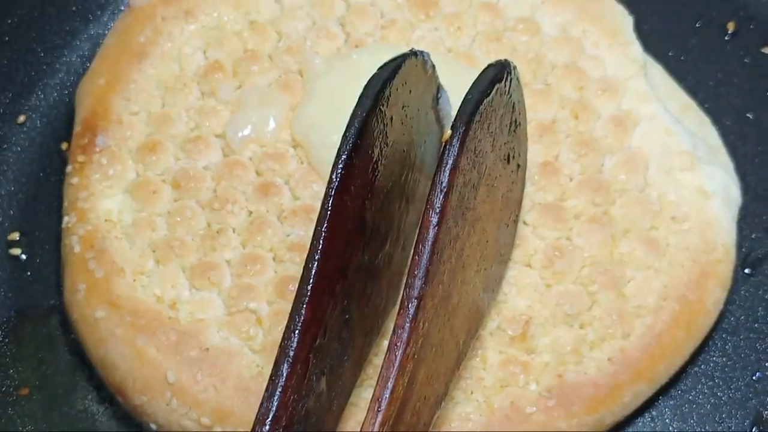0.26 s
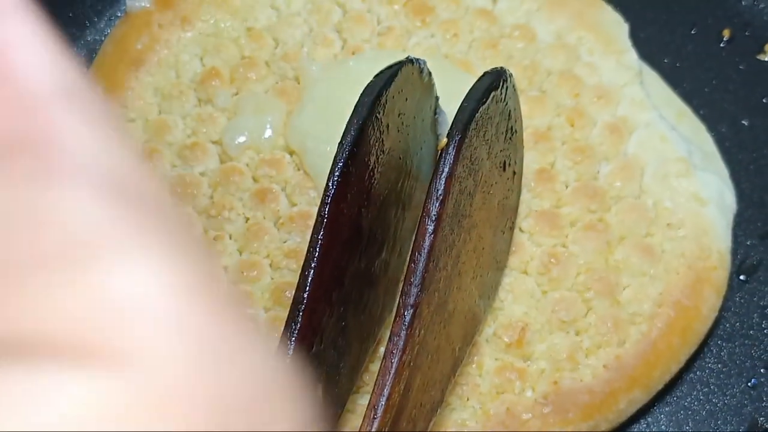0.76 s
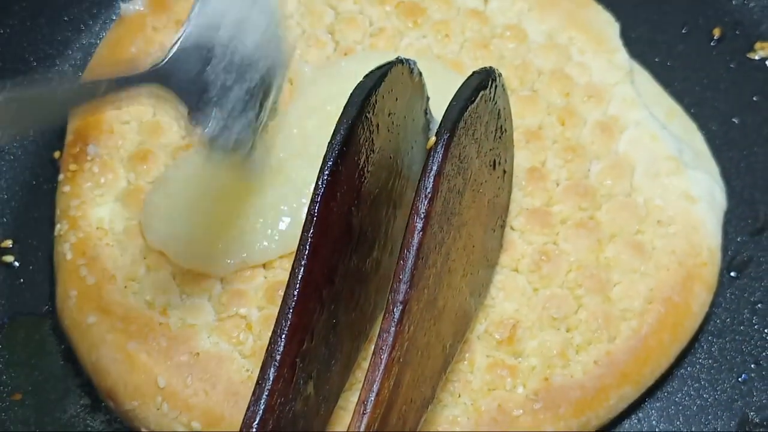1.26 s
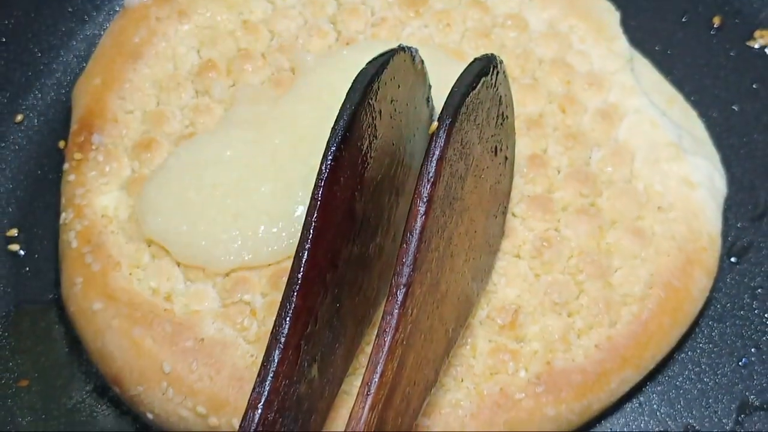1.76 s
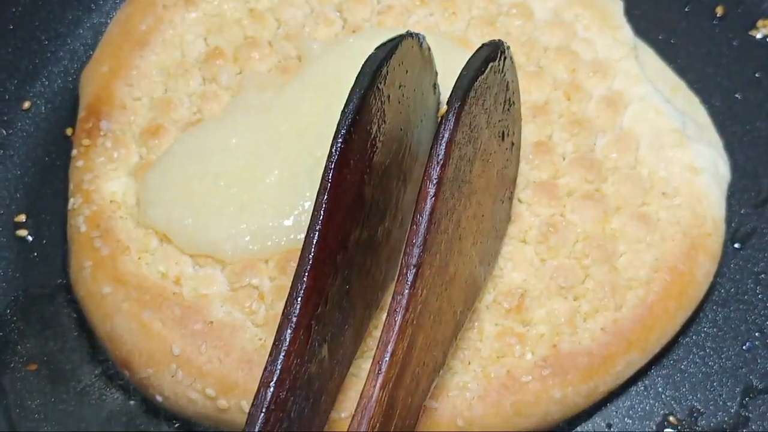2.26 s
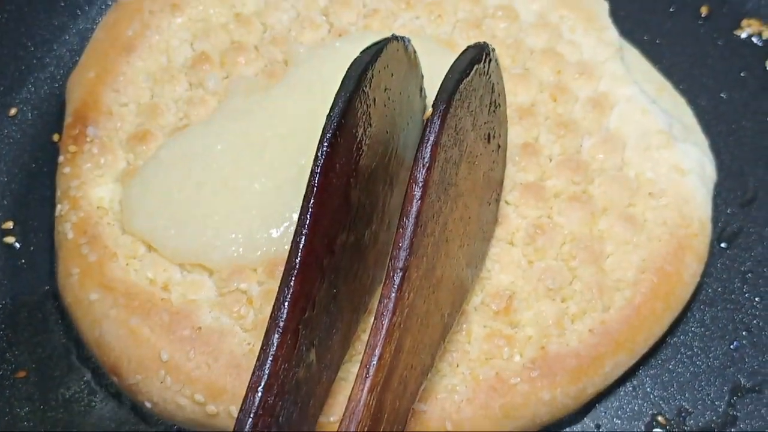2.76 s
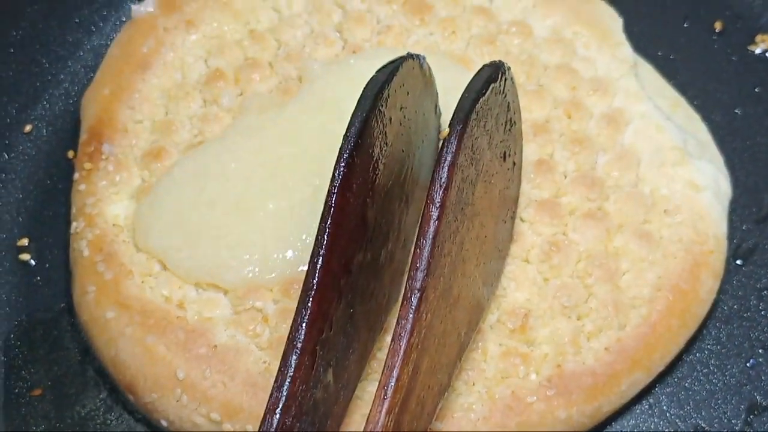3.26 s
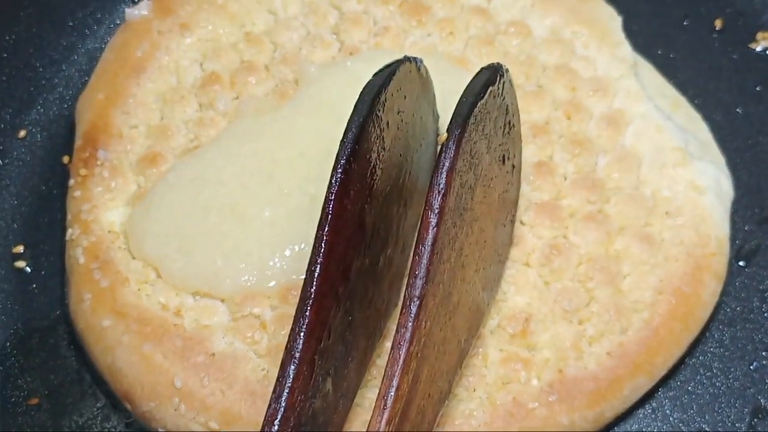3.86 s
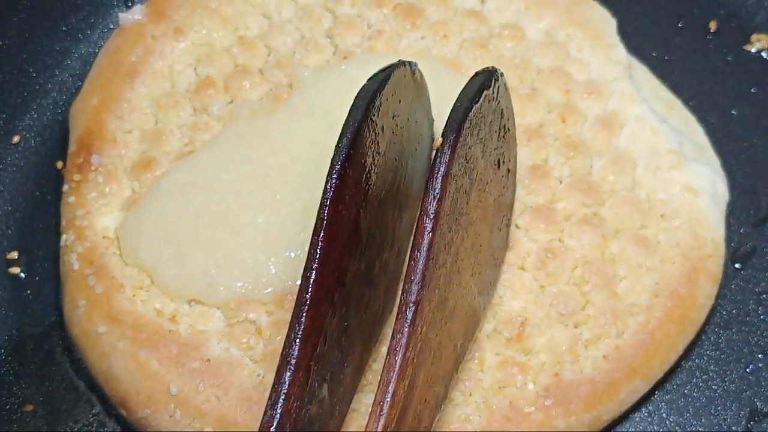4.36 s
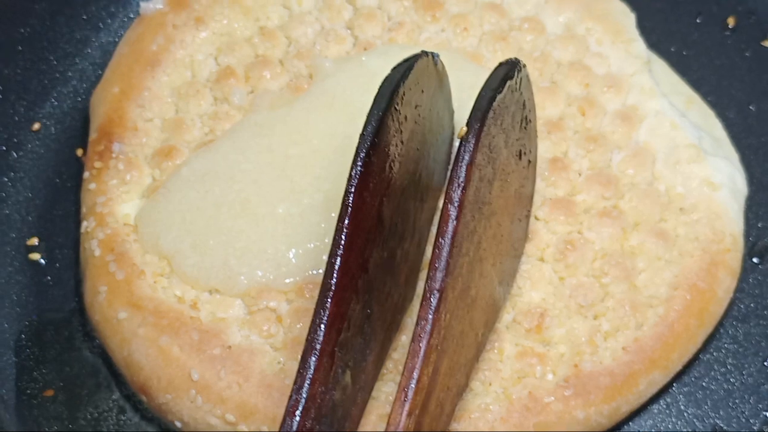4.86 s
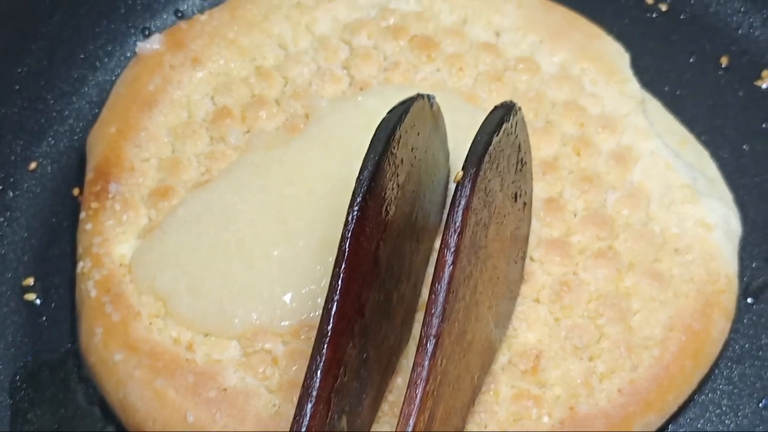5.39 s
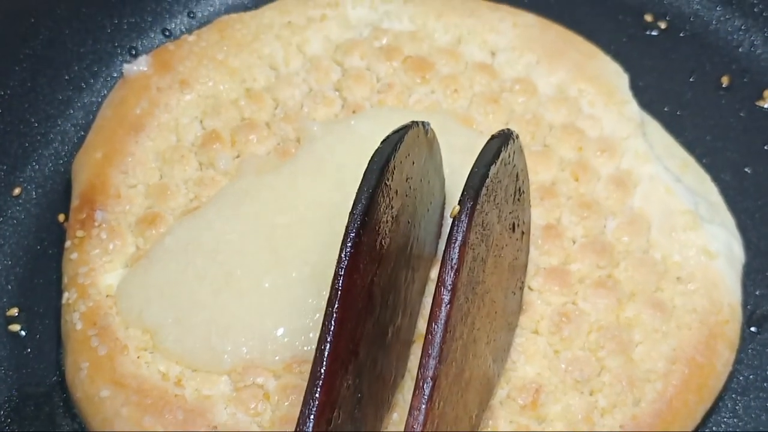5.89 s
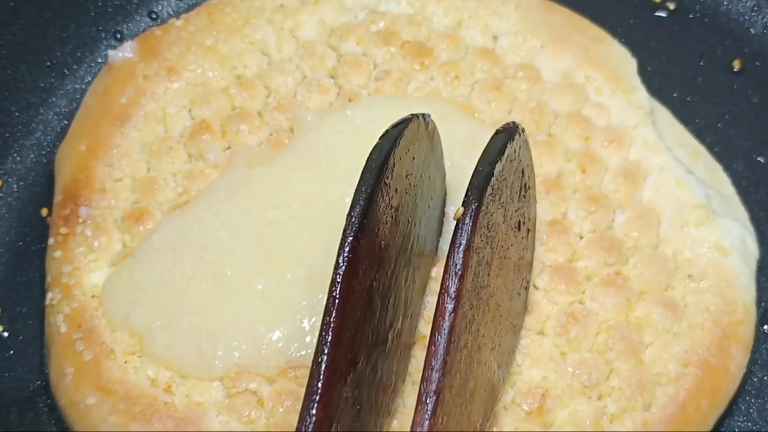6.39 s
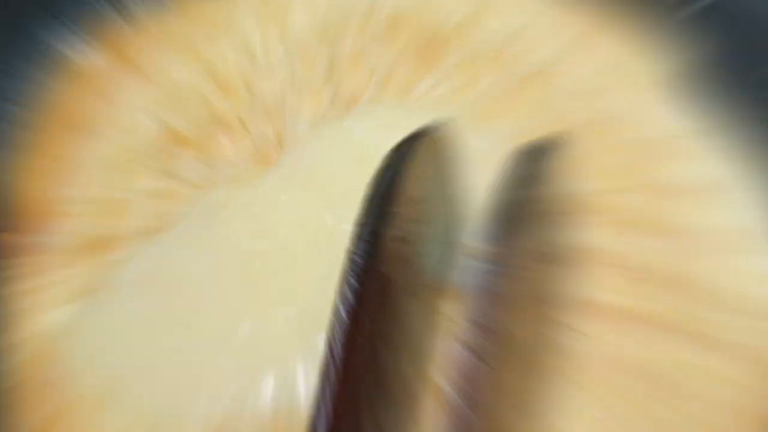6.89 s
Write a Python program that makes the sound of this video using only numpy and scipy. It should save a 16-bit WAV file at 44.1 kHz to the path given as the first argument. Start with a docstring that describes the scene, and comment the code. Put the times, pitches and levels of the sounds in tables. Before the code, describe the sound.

Flatbread frying in ghee with a fine fluttering sizzle and scattered sharp pops, one hard hollow double knock early on, close in a small kitchen.

```python
"""A fine, fluttering sizzle runs throughout, with sharp pops scattered over it: a flatbread fries in ghee
in a heavy pan, close by in a small kitchen. Hiss makes the sizzle; random clicks ring the pan as bubbles;
water bursting in the fat makes short noise pops. Once something hard, perhaps the ghee jar, is set down with
a hollow double knock of fading tones and clacks. Soft swells of noise and a low rumble lie underneath.
Near the end the sound drops out briefly."""
import sys
import numpy as np
from scipy import signal
from scipy.fft import rfft, irfft, next_fast_len
from scipy.io import wavfile
from scipy.ndimage import uniform_filter1d

SR = 44100
rng = np.random.default_rng(int(sys.argv[2]) if len(sys.argv) > 2 else 0)


def put_to_file(sound):
    """Save the sound as 16-bit audio at rate SR, in the file named by the first command-line argument."""
    columns = np.atleast_2d(sound).T  # one column per channel
    safe = np.clip(columns, -1, 1)
    whole_steps = np.round(safe * 32767)
    wavfile.write(sys.argv[1], SR, whole_steps.astype(np.int16))


N = 314433
TIME = np.arange(N) / SR  # seconds

# Levels in the tables are relative; the mix adds further gains.
# kitchen rumble: (frequency [Hz], level per Hz [dB])
RUMBLE_SPECTRUM = [(20, -19), (50, -16), (100, 1), (170, -3.5), (330, -3), (600, -11), (1000, -13.5),
                   (2500, -29)]
# soft swells of noise, dull or fizzy:
# (time of peak [s], length either side [s], centre [Hz], level [dB])
NOISE_SWELLS = [(0.14, 0.24, 695, -65.5), (1.686, .17, 700, -65.5), (3.235, 0.11, 148, -47),
                (4.262, 0.049, 830, -47.5), (4.291, 0.036, 398, -48), (5.036, 0.054, 4020, -47),
                (5.133, 0.042, 570, -58.5), (5.208, .03, 4270, -53), (5.52, 0.07, 101.4, -51),
                (5.924, 0.021, 1180, -48.5), (6.31, 0.017, 1610, -54), (6.73, 0.26, 157, -58.5)]
# contacts of the jar: (time [s], body level [dB], clack centre [Hz], clack width [octaves], clack level [dB])
JAR_CONTACTS = [(2.057, -30, 2520, 8.4, -16), (2.1803, -9.5, 2530, 1.1, 7.5), (2.2275, 0.5, 1700, 2.3, 9),
                (2.304, -14.5, 1100, 2.8, -16.5), (2.3389, -19.5, 980, 0.9, -8.5)]
# ringing tones of jar and counter: (frequency [Hz], level [dB], time to fade by 60 dB [s])
COUNTER_TONES = [(159.7, -28, 0.42), (242, -23, 0.4), (283.6, 6.5, 0.025), (295.2, -18, 0.47),
                 (323.7, -17, 0.34), (422, -30.5, .33), (499.3, -20, .24), (528, -15, .35),
                 (529, -6.5, 0.068), (620, -25.5, 0.29), (740, -24, 0.27), (779, -10, 0.034),
                 (1066, -16, 0.082), (1370, -28.5, 0.058)]
# strength of the frying: (time [s], sizzle level [dB], bubbling level [dB])
FRYING_LEVELS = [(0.0, -57, -51.5), (1.64, -51.5, -75.5), (2.24, -49.5, -43), (2.54, -52, -67),
                 (3.7, -51, -63), (4.12, -52, -54.5), (4.57, -51, -59.5), (6.23, -52, -55),
                 (6.95, -49.5, -56)]
# fine sizzle: (frequency [Hz], level per Hz [dB])
SIZZLE_SPECTRUM = [(600, -18), (1600, -6.5), (2800, -9), (4000, -8), (5800, -0.5), (7200, -1), (9500, 2.5),
                   (12500, -3), (16000, 0.5)]
# the pan's resonances: (frequency [Hz], width [Hz], level over the direct sound [dB])
PAN_RESONANCES = [(1060, 14, -9), (1463, 61, 2), (1605, 56, -0.5), (2184, 58, 3), (2367, 76, -6.5),
                  (3240, 200, -16.5), (3970, 23, -3.5), (4380, 36, -1), (5840, 137, -7.5)]
# the loudest bursting droplets:
# (time [s], cavity pitch [Hz], cavity ring level [dB], snap level [dB], spray level [dB])
DROPLETS = [(0.185, 10300, -10, -26.5, -9.5), (0.239, 10100, -20.5, -43, -19.5),
            (0.297, 10500, -25, -30, -16), (0.4701, 1450, 1, -12.5, -25), (0.4786, 1410, 1, -11, -37),
            (0.642, 6070, -8, -17, -11), (0.7776, 6610, 7.5, -13.5, -4), (0.886, 4560, -11.5, -17.5, -33.5),
            (0.946, 2020, -14, -33, -32.5), (0.9778, 5630, -9.5, -16.5, -8.5),
            (0.9887, 4430, -10.5, -18.5, -52), (1.0, 6440, -10, -28.5, -29), (1.2193, 1360, 7.5, 3, 1),
            (1.223, 2670, 2.5, -20, -18), (1.265, 11200, -12, -16, -16), (1.3024, 15000, 1, -12.5, 3.5),
            (1.375, 15700, -12.5, -35, -16), (1.6885, 13500, -8, -28, -10.5), (1.8566, 6300, -6, -14, 5.5),
            (1.994, 15700, -12, -28.5, -12.5), (2.124, 5000, -17.5, -39, -6.5),
            (2.249, 6220, 2, -22.5, -22.5), (2.164, 2600, -22, -17, -24), (2.470, 1780, -17, -12.5, -17),
            (2.558, 9230, -4.5, -11.5, -19), (2.588, 2540, -6, -7, -35), (2.791, 7240, -12.5, -24, -10.5),
            (2.875, 4200, -27, -27, -8.5), (2.897, 7060, -12, -15.5, -35), (3.033, 5070, -20, -14.5, -18),
            (3.1717, 2330, -11, -1.5, -28), (3.18, 5970, 0.5, -41, -10), (3.6, 1300, -10, -40, -34),
            (3.68, 5820, -19.5, -23.5, -17), (3.8331, 6760, -2, -4.5, -1.5), (3.8573, 5100, 10, -8.5, 3),
            (3.868, 9200, 1, -15, 12.5), (3.943, 11070, -6.5, -49, -33), (4.017, 8350, -0.5, -22.5, -31),
            (4.028, 8660, -5, -37, -29.5), (4.079, 14400, 0, -29, -4.5), (4.226, 2890, -7, -9.5, -35),
            (4.241, 2830, -5.5, -8, -33), (4.253, 4000, -7, -10.5, -7.5), (4.3824, 2760, 6.5, 9, 1.5),
            (4.569, 1710, -13, -38.5, -12.5), (4.7238, 9060, -4.5, -54, -24), (4.816, 10470, -14, -22, -32),
            (4.84, 1430, -1, 11.5, 8), (4.968, 6780, 0.5, -19, -29), (5.084, 9550, -16.5, -38, -14),
            (5.4395, 14700, 5, -17.5, 5), (5.457, 6040, -7.5, -24, -6), (5.538, 9700, -7, -41, -0.5),
            (5.5437, 4370, -2.5, -43, -25), (5.677, 8240, -6, -18, -36), (5.745, 9400, -11, -6, -28),
            (5.8077, 3700, -11.5, -38, -12), (5.895, 1400, -29, -54, -33), (5.912, 1320, -18, -17, -13),
            (5.956, 4880, -6, -45, -37), (6.076, 8020, -10, -46, -12), (6.124, 9480, -5.5, -27, 2.5),
            (6.217, 10070, -3, -14.5, 0), (6.2715, 10600, -8, -54, -37), (6.379, 10750, -4.5, -22, -12),
            (6.461, 9500, -7.5, -30, -5.5), (6.531, 9400, -3, -45, -30), (6.582, 1720, -7.5, -20, 0.5),
            (6.588, 9600, -4, -17, 4.5)]
# weak droplets sputter, strong ones crack:
# (level of strongest part [dB], click height [times noise spread], rise [s], crack's 60 dB fade [s])
DROPLET_FORCE = [(-16, 1.2, .0012, 0.0072), (6.5, 1.1, 0.00082, 0.0019)]
# delays of the pan wall's echo: (shortest [s], longest [s])
WALL_ECHO_DELAYS = (.0008, 0.0032)
# microphone colour: (frequency [Hz], level [dB])
MICROPHONE_COLOUR = [(6000, 0.5), (7900, -2.5), (10000, 6), (11300, -2.5), (12700, -10.5), (13900, -11),
                     (15000, 0.5)]
# short silence: (start [s], end [s])
SILENT_SPAN = (6.989, 7.055)

# T60 is the time a sound takes to fade by 60 dB
KITCHEN_T60_S = 0.31
SWELL_OCTAVES = 0.52
STIR_DB = -64.5  # bubbling that a snap stirs up in the fat, against the snap
SETTLE_T60_S = 1.3  # it then settles
CAVITY_WIDTH_HZ, CAVITY_MID_HZ = 1310, 5000  # width of a cavity's resonance at middle pitch
WIDTH_POWER = 0.21  # width grows by this power of pitch: small, high cavities fade a little faster
WALL_ECHO_DB = -7.5
CLIP_LEVEL, CUTOFF_HZ = 0.92, 15700


def from_db(db):
    """Turn decibels into a gain."""
    return 10 ** (np.asarray(db) / 20)


def rms_one(x):
    """Scale a signal to an average strength (rms) of 1."""
    return x / np.sqrt(np.mean(x ** 2) + 1e-20)


def add(out, s, sound):
    """Mix a short sound in at a given time in seconds."""
    at = int(s * SR)
    out[at:at + len(sound)] += sound[:N - at]


def colour(x, points):
    """Make some pitches louder and others softer, following a smooth (Hz, dB) table."""
    hz, db = np.transpose(points)
    size = next_fast_len(N + 4096)
    bins_hz = np.arange(size // 2 + 1) * SR / size
    gain = from_db(np.interp(np.log(bins_hz + 1), np.log(hz), db))
    return irfft(rfft(x, size) * gain, size)[..., :N]


def band(x, hz, octaves):
    """Keep the pitches round a centre, as a resonance does."""
    half = 2 ** (max(octaves, 0.05) / 2)
    edges = [min(hz / half, 0.4 * SR), min(hz * half, 0.44 * SR)]
    return signal.sosfilt(signal.butter(2, edges, "band", fs=SR, output="sos"), x + 1e-18)


def high_pass(x, hz, order=2):
    """Take the bass out below a given pitch."""
    return signal.sosfilt(signal.butter(order, hz, "high", fs=SR, output="sos"), x + 1e-18)


def drift(per_s):
    """Wander at random between points this many times a second, with rms 1."""
    knots = rng.standard_normal(int(per_s * N / SR) + 2)
    return rms_one(np.interp(TIME * per_s, np.arange(len(knots)), knots))


def burst(hz, octaves, click=1.38, rise_s=0.0007, crack_t60=0.005, scatter_db=-11.5, scatter_t60=0.063):
    """A click and a brief crack, then their scattered sound, heard in one band; energy 1."""
    t = TIME[:SR // 12]
    fade = from_db(-60 * t / crack_t60) + from_db(scatter_db - 60 * t / scatter_t60)
    push = rng.standard_normal(len(t)) * fade
    push *= 1 - np.exp(-(t / rise_s) ** 2)  # in a pop, the film takes a moment to tear
    push[SR // 1200] += click
    sound = band(push, hz, octaves)
    return sound / np.sqrt(np.sum(sound ** 2))


def kitchen(x, wall_hz=7500, build_s=0.0041):
    """The room's echoes blend into a tail that builds up quickly, its treble dulled by the walls."""
    t = TIME[:SR // 2]
    fade = from_db(-60 * t / KITCHEN_T60_S) * (1 - np.exp(-t / build_s))
    tail = rng.standard_normal(len(t)) * fade
    tail /= np.sqrt(np.sum(tail ** 2))
    walls = signal.butter(1, min(wall_hz, SR / 3), fs=SR, output="sos")
    return signal.fftconvolve(x, signal.sosfilt(walls, tail))[:N]


def rumble(level_db, rise_db):
    """The kitchen's low noise wavers while its level shifts steadily by rise_db."""
    level = from_db(level_db + rise_db * TIME / TIME[-1] + 0.68 * drift(4.036))
    return level * rms_one(colour(rng.standard_normal(N), RUMBLE_SPECTRUM))


def swells(grain_db=-1.0):
    """Soft, grainy noise rises and falls, each swell in its own band."""
    out, grain = np.zeros(N), from_db(grain_db * drift(150))
    for s, length, hz, db in NOISE_SWELLS:
        shape = np.exp(-((TIME - s) / length) ** 2)
        noise = rms_one(band(grain * rng.standard_normal(N), hz, SWELL_OCTAVES))
        out += from_db(db) * shape * noise
    return out


def jar(body_db=-1.0, clack_db=-0.5, low_hz=100, jar_room_db=-8.0, room_low_hz=650):
    """An edge lands, then the whole base, then it settles; each contact rings the counter and clacks."""
    t, thud, clack = TIME[:SR * 2 // 3], np.zeros(N), np.zeros(N)
    body = sum(from_db(db - 60 * t / t60) * np.sin(2 * np.pi * hz * t) for hz, db, t60 in COUNTER_TONES)
    body = body * (1 - np.exp(-t / 0.0039))  # the heavy counter takes a moment to move
    for s, blow_db, hz, octaves, edge_db in JAR_CONTACTS:
        add(thud, s, from_db(body_db + blow_db) * body)
        hit = burst(hz, octaves, click=5.6, crack_t60=0.006, scatter_db=-11.5, scatter_t60=0.066)
        add(clack, s, from_db(clack_db + edge_db) * hit)
    knock = high_pass(thud + clack, low_hz, order=3)
    return knock + from_db(jar_room_db) * kitchen(high_pass(knock, room_low_hz))


def pan_body(x):
    """The pan rings along, at its own pitches, with whatever bursts on it."""
    ringing = 0
    for hz, width, db in PAN_RESONANCES:
        ringing = ringing + from_db(db) * signal.lfilter(*signal.iirpeak(hz, hz / width, fs=SR), x + 1e-18)
    return x + ringing


def stirring():
    """Gain of the bubbling that flares after each snap and settles again."""
    kicks, keep = np.zeros(N), from_db(-60 / (SETTLE_T60_S * SR))
    for s, _, _, snap_db, _ in DROPLETS:
        kicks[int(s * SR)] = from_db(STIR_DB + snap_db)
    return signal.lfilter([1], [1, -keep], kicks)


def bubbling(per_s=130.0, low_hz=1150, high_hz=7000, width_hz=45, spread_db=2.5, clump_db=3.5, count=18):
    """Larger bubbles, stronger in clumps, ring the pan's fine overtones in random strengths; rms 1."""
    sizes = from_db(clump_db * drift(12) + spread_db * np.minimum(rng.exponential(1, N), 2))
    at, out = np.flatnonzero(rng.random(N) < per_s / SR), np.zeros(N)
    detune = 1 + rng.uniform(-0.55, 0.4, count) / count
    for hz in np.geomspace(low_hz, high_hz, count) * detune:
        clicks = np.full(N, 1e-18)
        clicks[at] = sizes[at] * rng.standard_normal(len(at))
        out += signal.lfilter(*signal.iirpeak(hz, hz / width_hz, fs=SR), clicks)
    return rms_one(out)


def sizzle(heat, flutter_db=2.37, level_db=0.5):
    """Countless minute bubbles under the bread merge into a fluttering hiss."""
    hiss = rms_one(colour(rng.standard_normal(N), SIZZLE_SPECTRUM))
    return heat * from_db(level_db + flutter_db * drift(25)) * hiss


def crackle(heat, per_s=12.0, level_db=20.5, spread_db=6.0, low_hz=2200, high_hz=14000):
    """Small bubbles burst at random in faint, soft ticks, more of them high than low."""
    out = np.zeros(N)
    for when, size, pitch in rng.random((int(per_s * N / SR), 3)):
        hz = low_hz * (high_hz / low_hz) ** np.sqrt(pitch)
        size_db = level_db + spread_db * min(-np.log(size), 2)
        tick = burst(hz, 0.83, click=1.2, rise_s=0.00097, crack_t60=0.006)
        add(out, when * TIME[-1], heat[int(when * N)] * from_db(size_db) * tick)
    return out


def pops(snap_hz=3130, snap_octaves=2.13, spray_hz=11300, spray_octaves=1.65):
    """Each droplet snaps the film of fat, rings its little cavity and throws a bright spray."""
    out = np.zeros(N)
    force_db, *shapes = np.transpose(DROPLET_FORCE)
    lags = rng.uniform(*WALL_ECHO_DELAYS, len(DROPLETS))
    for (s, hz, ring_db, snap_db, spray_db), lag in zip(DROPLETS, lags):
        width = CAVITY_WIDTH_HZ * (hz / CAVITY_MID_HZ) ** WIDTH_POWER
        octaves = 2 * np.arcsinh(width / hz / 2) / np.log(2)
        strongest_db = max(ring_db, snap_db, spray_db)
        attack = [np.interp(strongest_db, force_db, shape) for shape in shapes]
        ring = from_db(ring_db) * burst(hz, octaves, *attack)
        snap = from_db(snap_db) * burst(snap_hz, snap_octaves, *attack)
        spray = from_db(spray_db) * burst(spray_hz, spray_octaves, *attack)
        pop = ring + snap + spray
        add(out, s, pop)
        add(out, s + lag, from_db(WALL_ECHO_DB) * pop)  # the wall's echo ripples its spectrum
    return out


def scene(pops_db=-2.0, pop_floor_hz=850, bubbling_db=-10.5, room_db=-15.0,
          rumble_db=-59.5, rumble_rise_db=-0.5, side_db=-15.0):
    """Mix pan and jar in the kitchen, heard nearly in mono."""
    s, *levels = np.transpose(FRYING_LEVELS)
    heat, boil = (from_db(np.interp(TIME, s, level)) for level in levels)
    background = rumble(rumble_db, rumble_rise_db) + swells()
    bubbles = (from_db(bubbling_db) * boil + stirring()) * bubbling()
    frying = pan_body(sizzle(heat) + bubbles)
    # droplets are too small to radiate bass
    droplets = from_db(pops_db) * pops() + crackle(heat)
    bursts = pan_body(high_pass(droplets, pop_floor_hz, order=4))
    mid = background + jar() + frying + bursts + from_db(room_db) * kitchen(bursts)
    # a faint copy of the treble, 1 ms late and opposite in the two channels, grows with loudness
    loudness = uniform_filter1d(np.abs(bursts), SR // 100)
    late_treble = high_pass(np.roll(bursts, SR // 1000), 5300, order=10)
    side = from_db(side_db) * loudness / loudness.max() * late_treble
    return np.array([mid + side, mid - side])


def record(dry):
    """Microphone colour, a brief silence near the end, flat tops on overload and a steep top cut."""
    live = (TIME < SILENT_SPAN[0]) | (TIME > SILENT_SPAN[1])
    sound = np.clip(colour(dry, MICROPHONE_COLOUR) * live, -CLIP_LEVEL, CLIP_LEVEL)
    return signal.sosfilt(signal.ellip(10, 0.2, 70, CUTOFF_HZ, fs=SR, output="sos"), sound)


dry = scene()
out = record(dry)
put_to_file(out)
```